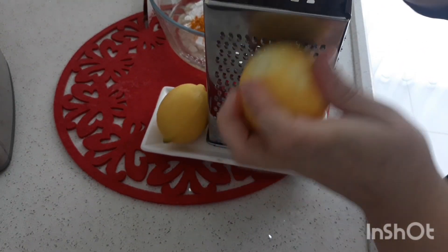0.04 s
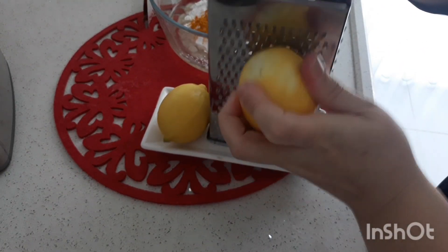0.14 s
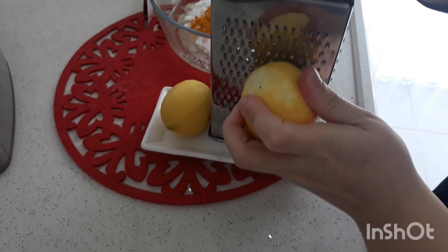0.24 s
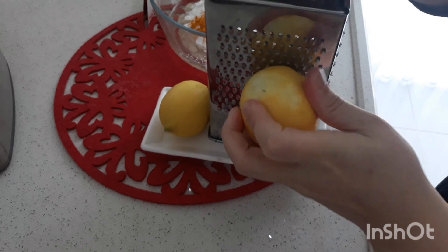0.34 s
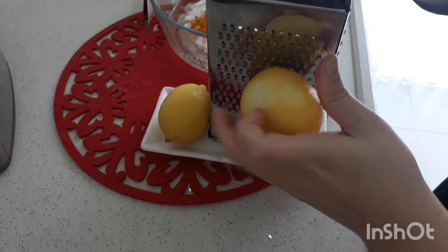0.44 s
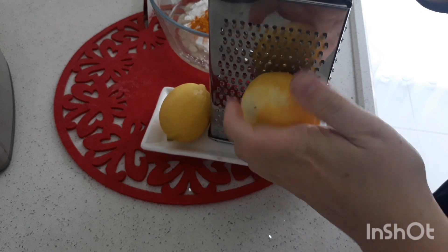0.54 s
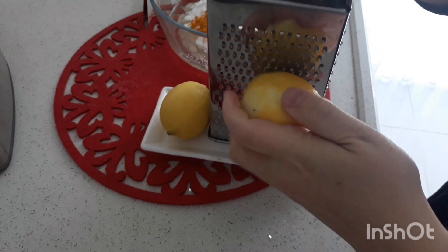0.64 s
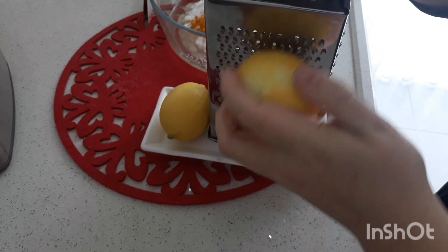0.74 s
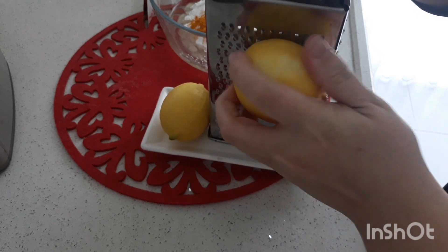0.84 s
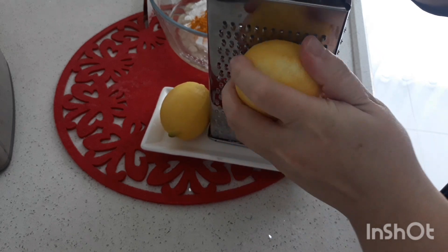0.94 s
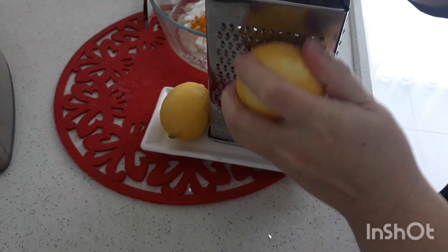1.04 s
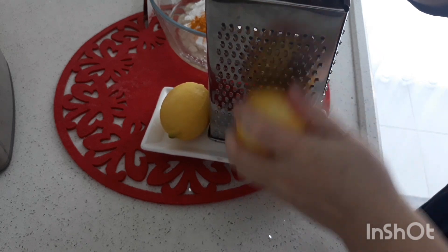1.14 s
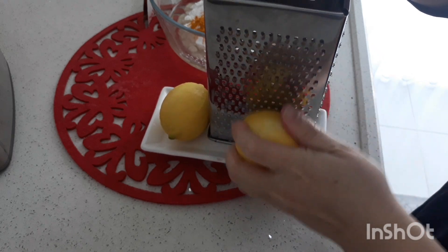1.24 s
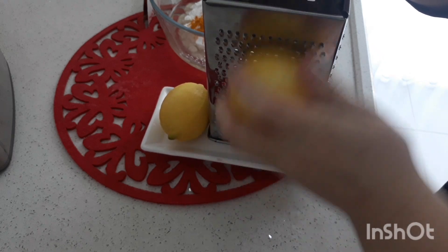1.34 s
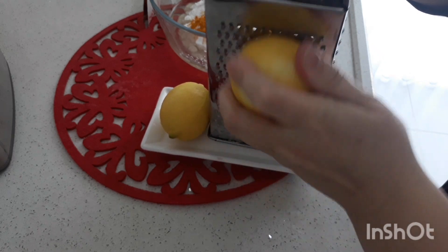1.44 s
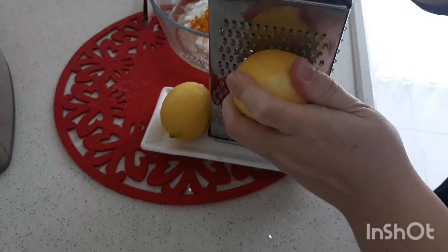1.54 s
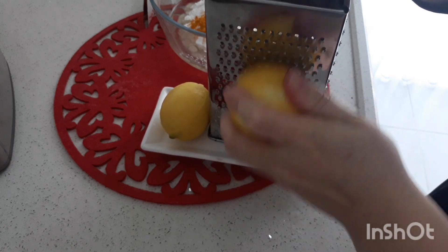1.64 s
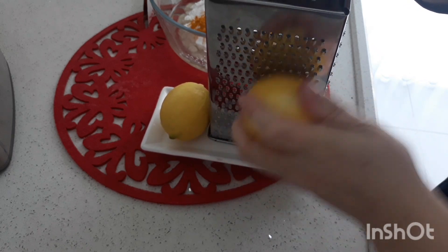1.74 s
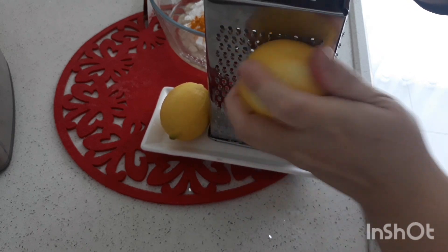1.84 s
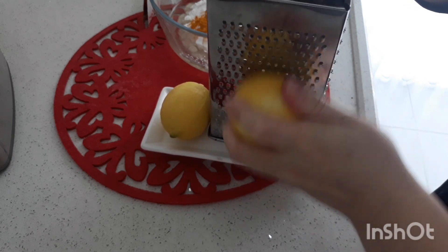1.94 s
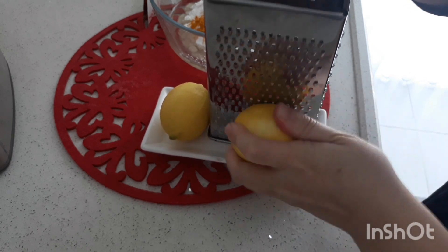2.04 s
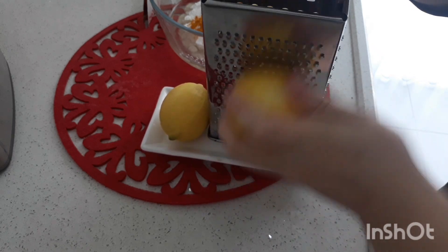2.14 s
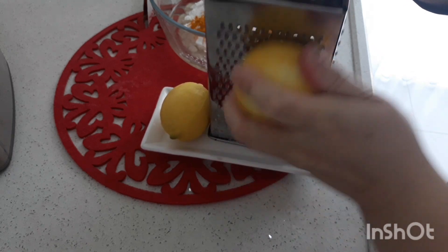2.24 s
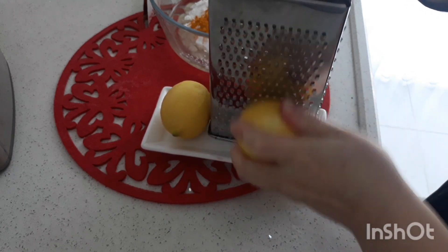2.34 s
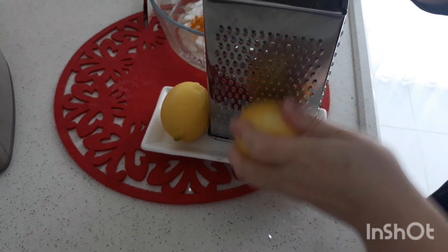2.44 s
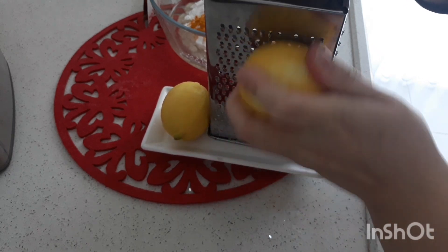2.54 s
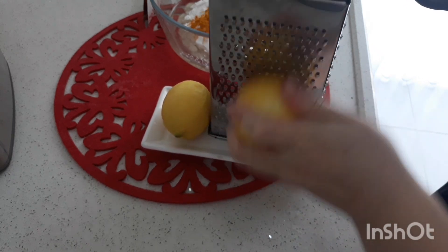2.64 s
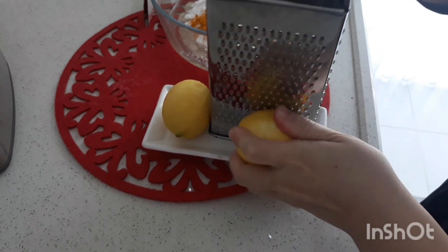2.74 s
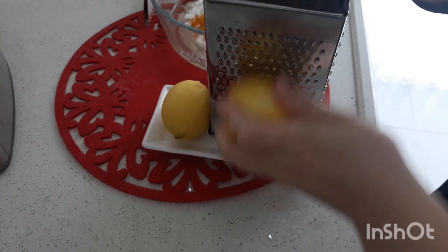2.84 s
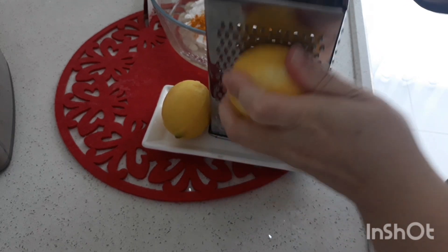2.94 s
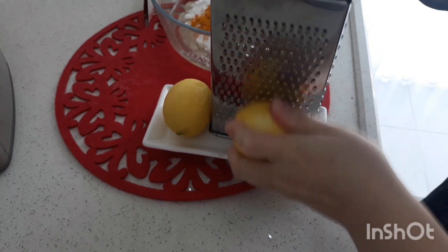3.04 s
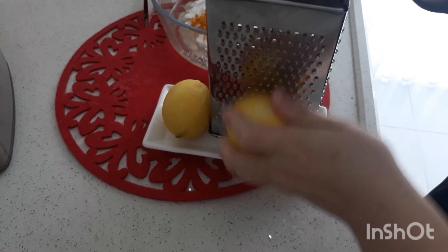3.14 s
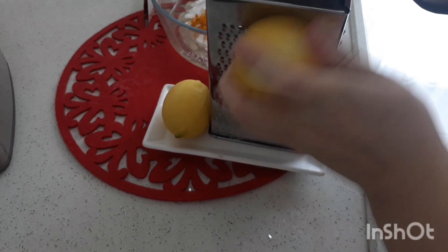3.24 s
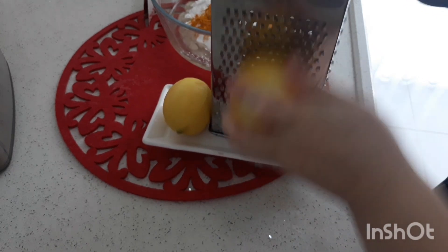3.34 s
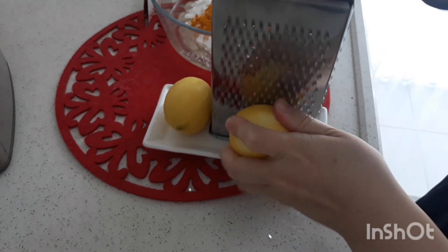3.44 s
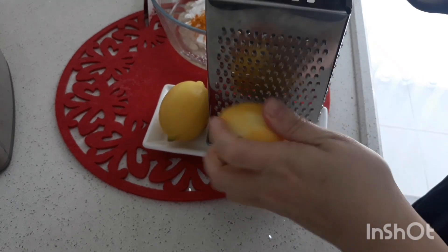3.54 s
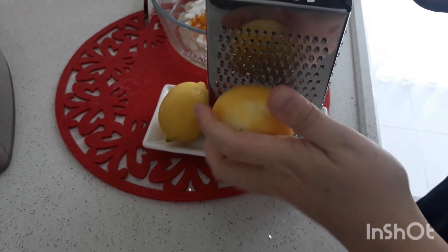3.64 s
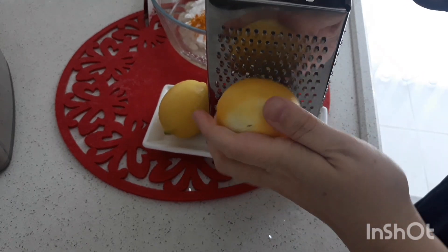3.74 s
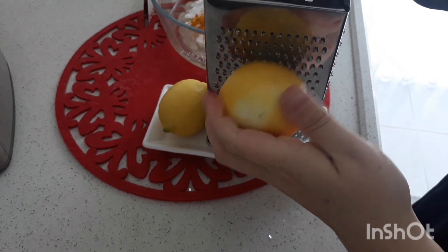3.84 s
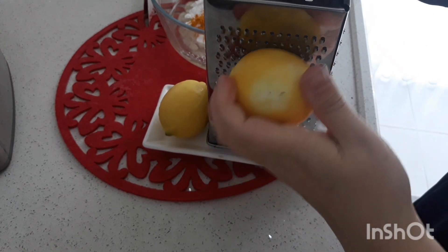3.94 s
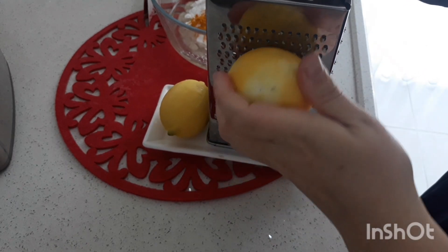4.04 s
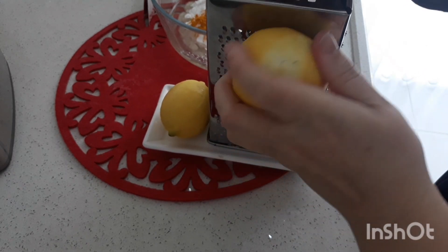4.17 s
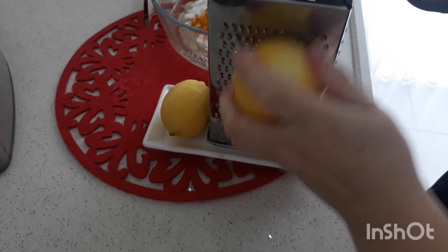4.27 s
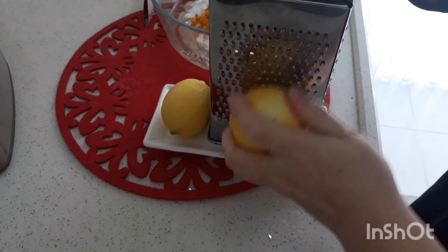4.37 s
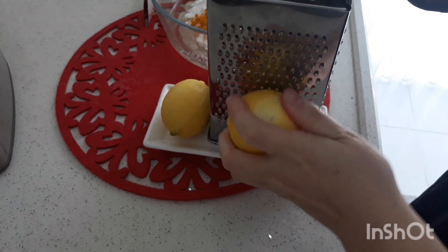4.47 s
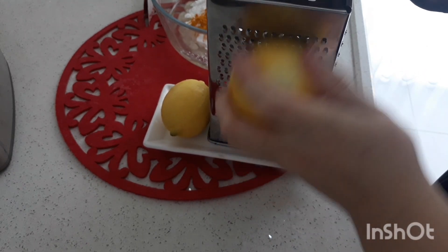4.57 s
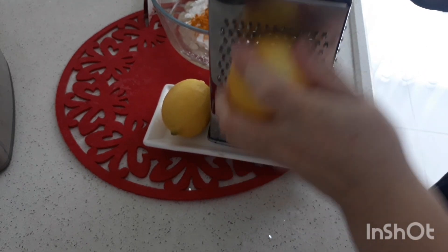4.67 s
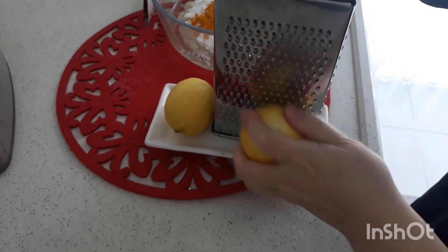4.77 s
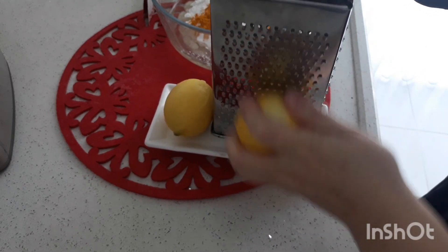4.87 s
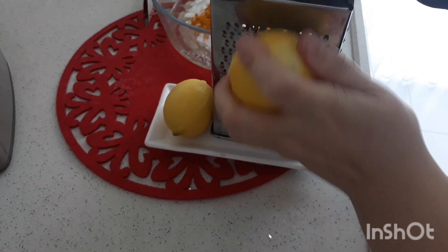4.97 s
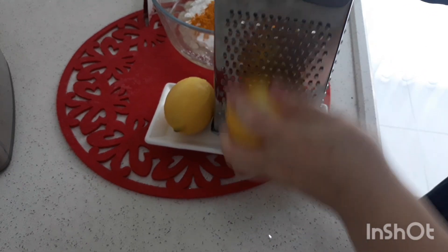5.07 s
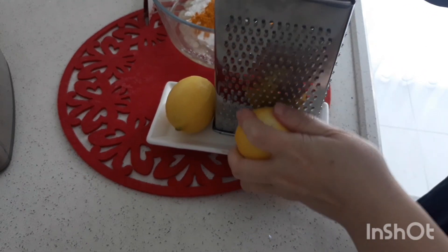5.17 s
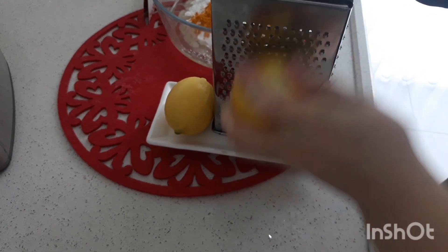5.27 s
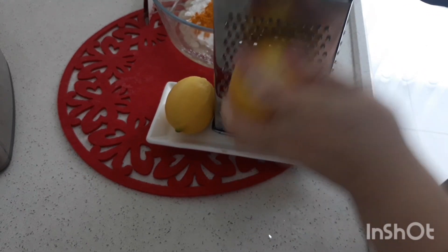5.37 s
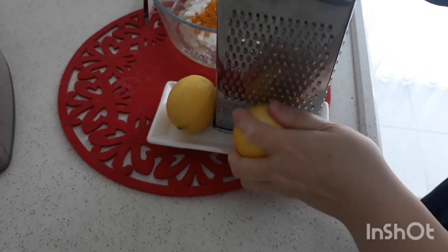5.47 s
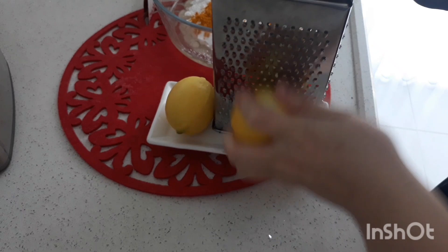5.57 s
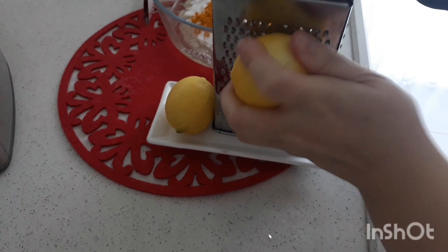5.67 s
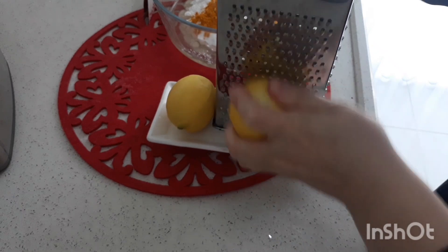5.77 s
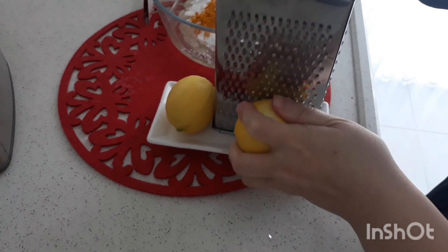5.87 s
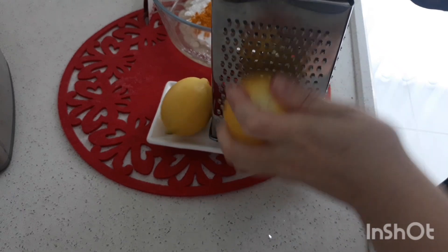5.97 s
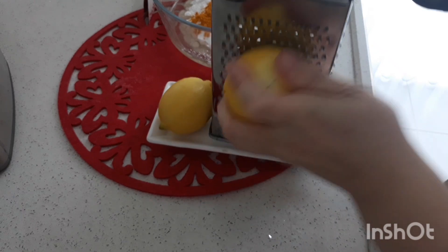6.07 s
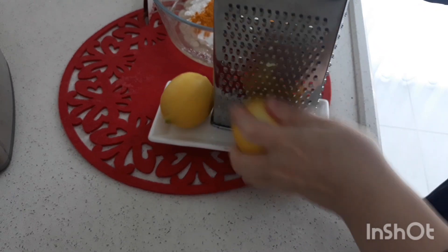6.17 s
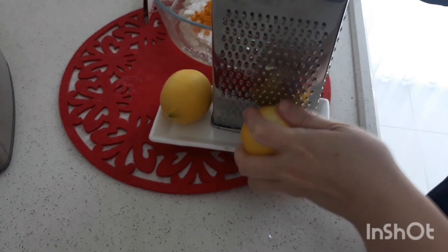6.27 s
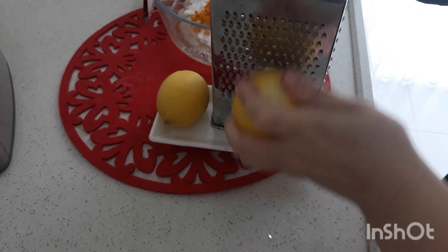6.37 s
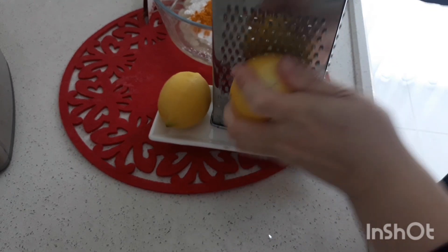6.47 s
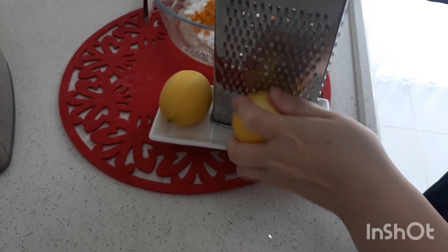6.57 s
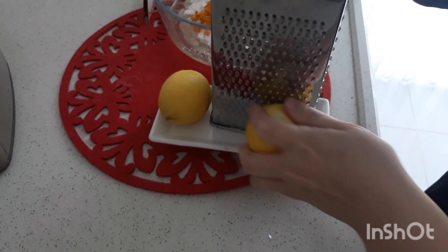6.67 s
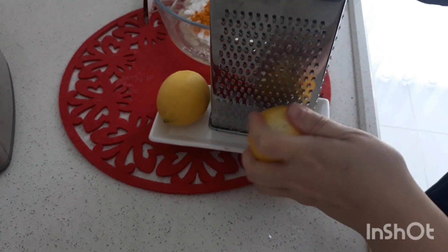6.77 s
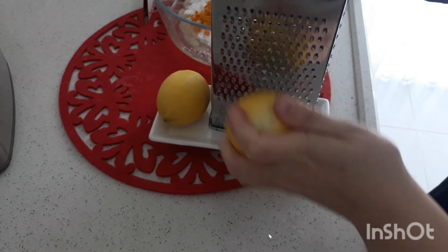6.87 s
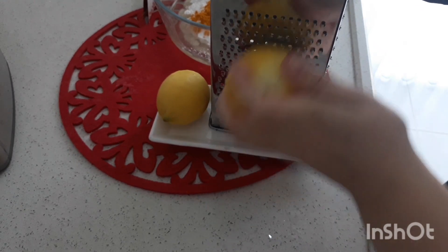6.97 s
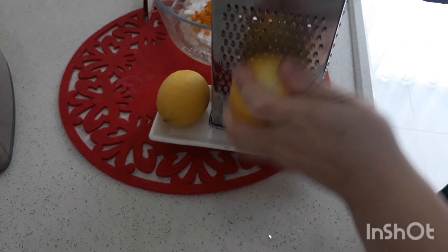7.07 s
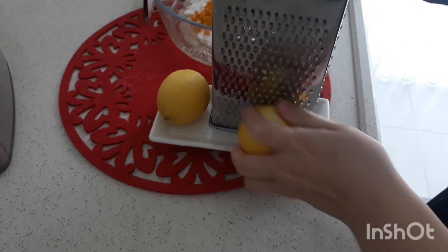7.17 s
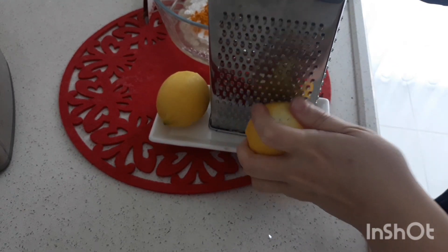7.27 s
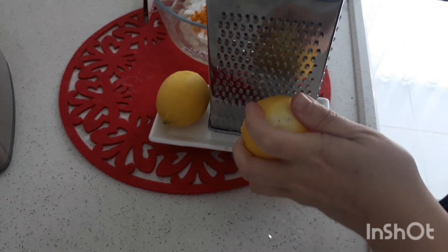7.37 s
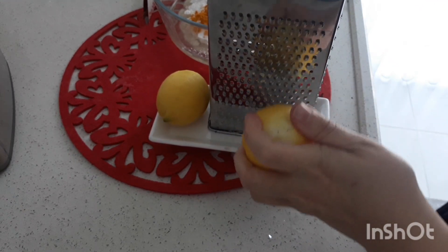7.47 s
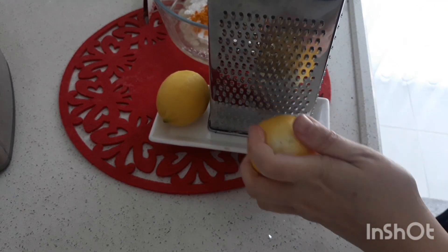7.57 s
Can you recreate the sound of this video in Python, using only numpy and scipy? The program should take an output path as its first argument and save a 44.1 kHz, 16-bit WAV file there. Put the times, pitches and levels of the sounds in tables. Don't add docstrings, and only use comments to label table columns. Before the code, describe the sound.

A citrus fruit is grated in short, bright, tearing scrapes, the steel grater clanking on its ceramic dish over a low room hum.

```python
import sys
import numpy as np
from scipy import signal
from scipy.fft import rfft, irfft, next_fast_len
from scipy.io import wavfile
from scipy.ndimage import uniform_filter1d, map_coordinates

SR = 44100
rng = np.random.default_rng(int(sys.argv[2]) if len(sys.argv) > 2 else 0)


def unload_wav(signal):
    wavfile.write(
        sys.argv[1],
        SR,
        np.round(np.clip(np.atleast_2d(signal).T, -1, 1) * 32767).astype(np.int16),
    )


def undo_db(level):
    steps = np.asarray(level, float) / 20
    return 10 ** steps


N = 335586


def unit(x):
    return x / np.sqrt(np.mean(x ** 2) + 1e-20)


def along(points, hz):
    f, v = np.transpose(points)
    return np.interp(np.log(hz + 1), np.log(f + 1), v)


def wobble(rate):
    knots = rng.standard_normal(int(N * rate / SR) + 4)
    return map_coordinates(knots, [np.arange(N) * rate / SR])


def filtered(x, response):
    m = next_fast_len(len(x) + SR // 2)
    return irfft(rfft(x, m) * response(np.fft.rfftfreq(m, 1 / SR)), m)[:len(x)]


def peak(f, hz, width):
    return 1j * f * width / (hz * hz - f * f + 1j * f * width)


def patchy(x, depth_db, bands, frames):
    z = signal.stft(x, nperseg=256)[2]
    field = uniform_filter1d(rng.standard_normal(z.shape), size=bands, axis=0)
    field = uniform_filter1d(field, size=frames, axis=1)
    return unit(signal.istft(z * undo_db(depth_db * unit(field)), nperseg=256)[1][:N])


def air():
    # pitch_hz, level_db (per Hz)
    tone = [(18, -70), (30, -43), (85, -13.5), (102, -7), (200, -9), (240, -5), (304, -4), (552, -18),
            (754, -17.5), (2310, -50.5), (7630, -37.5), (9640, -55.5), (13000, -45.5), (16000, -47.5)]
    hum = filtered(rng.standard_normal(N), lambda f: undo_db(along(tone, f)))
    return undo_db(-52.5) * patchy(hum, depth_db=1.0, bands=2, frames=40)


def contact(rows, ring_db_per_s):
    land_s = 60 / 1103.5
    touch_db, sag_db = -8, -1.5
    let_go_s, let_go_db = 0.056, -17
    t = np.arange(0, N / SR + .01, .001)
    power = undo_db(2 * -85)
    for s, swell, hold, db in rows:
        times = s + np.cumsum([-land_s, land_s, swell, hold, let_go_s, 1])
        steps = np.cumsum([touch_db - 60, 60, -touch_db, sag_db, let_go_db, -ring_db_per_s])
        power = power + undo_db(2 * (db + np.interp(t, times, steps)))
    return np.interp(np.arange(N) / SR, t, 10 * np.log10(power))


def pressure():
    # touch_s, swell_s, hold_s, rasp_db, body_db (re rasp)
    strokes = [(0.103, 0.011, 0.089, -26.5, -4), (1.072, .035, 0.07, -23.5, -8.5),
               (1.616, 0.006, .05, -29.5, -5.5), (1.895, 0.039, 0.07, -21, -10.5),
               (2.245, 0.044, 0.068, -18, -10), (2.598, 0.049, 0.043, -14.5, -11),
               (2.953, 0.031, 0.056, -17, -9), (3.304, 0.048, 0.027, -13, -10),
               (4.278, 0.056, 0.03, -18, -10.5), (4.662, 0.044, 0.062, -15, -9),
               (5.024, 0.037, 0.042, -12.5, -8.5), (5.365, .035, 0.05, -14.5, -8.5),
               (5.702, 0.033, 0.055, -21.5, -7), (6.091, 0.037, 0.054, -17.5, -7.5),
               (6.47, .04, 0.047, -21.5, -7.5), (7.059, 0.037, 0.036, -18.5, -8.5)]
    # touch_s, length_s, rasp_db, body_db (re rasp)
    drags = [(.002, 0.0053, -30.5, -2), (1.03, 0.034, -54, -2), (1.85, 0.044, -43.5, -8),
             (5.002, 0.016, -39, -3), (1.26, 0.067, -41.5, 1.5), (1.35, 0.015, -41.5, -6),
             (1.41, 0.051, -34, -0.5), (1.468, 0.023, -29.5, -14), (.34, 0.095, -57.5, 6),
             (2.1, 0.033, -40, -3.5), (2.44, 0.025, -36.5, -5.5), (2.79, 0.037, -38, -5.5),
             (3.13, 0.056, -37, -2.5), (3.22, 0.036, -43, 4), (3.46, 0.049, -32.5, -1),
             (4.22, 0.052, -53, -2.5), (4.51, 0.025, -47.5, -14), (4.85, 0.063, -38, -4),
             (5.2, 0.035, -37.5, -1), (5.55, .05, -40, -5), (5.92, 0.061, -35.5, 0), (6.58, 0.013, -32, -3)]
    # touch_s, length_s, rasp_db, body_db (re rasp)
    scuffs = [
        (.484, .03, -52.5, 2.5),
        (.664, 0.011, -57.5, 6),
        (.8, .008, -58, 13),
        (3.92, 0.065, -57.5, -24),
        (4.011, 0.0096, -50.5, 6),
        (4.113, 0.012, -50, 0),
        (6.791, .008, -43, -0.5),
        (6.988, .01, -57.5, -5),
        (7.354, 0.011, -39, 1.5),
    ]
    rows = [(*row, -17.5) for row in strokes]
    for table, swell_share, fizz in (drags, 0.35, -17), (scuffs, 0.3, -28):
        for s, length, db, body in table:
            rows.append((s, swell_share * length, (1 - swell_share) * length, db, body, fizz))
    s, swell, hold, db, body, fizz = np.transpose(rows)
    rasp_db = contact(zip(s, swell, hold, db), ring_db_per_s=167)
    body_db = contact(zip(s, swell, hold, db + body), ring_db_per_s=114)
    fizz_db = contact(zip(s, swell, hold, db + fizz), ring_db_per_s=164.5)
    return rasp_db, body_db - rasp_db, fizz_db - rasp_db


def ticks(rate, spread_db, life):
    when, size = rng.random((2, N))
    catch = (when < rate / SR) * undo_db(-spread_db * np.log(size + 0.0054))
    fade = np.exp(-np.arange(SR // 100) / SR / life)
    power = abs(signal.fftconvolve(catch ** 2, fade)[:N])
    return unit(np.sqrt(power) * rng.standard_normal(N))


def teeth(count, low_hz, high_hz, cycles, spread_db):
    when, pitch, size = rng.random((count, 3)).T[:, :, None]
    hz = low_hz + (high_hz - low_hz) * pitch
    k = np.arange(SR // 250)
    decay = np.exp(-k * hz / SR / cycles)
    twang = undo_db(-spread_db * np.log(size + 0.0058)) * decay * np.sin(2 * np.pi * hz * k / SR)
    places = (when * N).astype(int) + k
    return unit(np.bincount(places.ravel(), twang.ravel(), minlength=N)[:N])


def walls(f):
    # pitch_hz, width_hz, level_db
    steel = [(425.6, 22, 0), (667, 18, -0.5), (1224, 150, -8), (1535, 27, -5.5), (2010, 77, -4),
             (2410, 22, -12.5), (3270, 240, -11), (3630, 28, -10), (4170, 60, -11.5), (4470, 240, -9),
             (5460, 350, -15.5), (6330, 120, -3), (7690, 1100, -2.5)]
    return 1 + undo_db(2) * sum(undo_db(db) * peak(f, hz, width) for hz, width, db in steel)


def rasp():
    # pitch_hz, level_db (per Hz)
    tear_tone = [(1180, -27), (2000, -12), (2380, -9), (2590, -4), (5140, 0.5), (6460, -6), (7680, -5),
                 (8770, -9), (10500, -28), (13600, -54.5), (22000, -120)]
    # pitch_hz, level_db (per Hz)
    body_tone = [(88, -43.5), (150, -16), (277, -8.5), (611, -7), (667, -3.5), (889, -7.5), (1360, -1.5),
                 (3000, -8.5), (3900, -7.5), (6600, -120)]
    # pitch_hz, level_db (per Hz)
    fizz_tone = [(5290, -55), (9000, -23), (10200, -8), (11400, -6), (13900, -0.5), (15700, -4)]
    # peak_s, surge_db
    snags = [(1.106, 0.5), (1.484, 8), (1.945, 2.5), (2.018, 7), (2.308, 4.5), (2.7, 4.5), (3.33, 3.5),
             (4.301, 1.5), (4.75, 4.5), (5.095, 1), (5.399, 0.5), (5.769, 4), (5.8, 2.5), (6.134, -2),
             (6.526, 6.5), (6.542, 5.5), (7.12, 0.5), (7.147, 6.5)]
    rasp_db, body_db, fizz_db = pressure()
    grip_db = rasp_db + 0.65 * wobble(40)
    reach = SR // 50
    surge = np.exp(-(np.arange(-reach, reach) / SR / 0.0063) ** 2)
    for s, db in snags:
        grip_db[round(s * SR) - reach:][:2 * reach] += db * surge

    scratch = ticks(rate=5500, spread_db=-1.5, life=0.00038)
    tear = teeth(count=30000, low_hz=1850, high_hz=10500, cycles=6.8, spread_db=3.0) + 1.92 * scratch
    tear = filtered(tear, lambda f: undo_db(along(tear_tone, f)) * walls(f))
    tear = patchy(tear, depth_db=2.0, bands=3, frames=9)
    body = ticks(rate=2500, spread_db=2.0, life=.0009)
    body = filtered(body, lambda f: undo_db(along(body_tone, f)) * walls(f))
    body = patchy(body, depth_db=3.0, bands=2, frames=9)
    fizz = unit(filtered(scratch, lambda f: undo_db(along(fizz_tone, f))))
    return undo_db(grip_db - 2.0) * (tear + undo_db(body_db + 1.0) * body + undo_db(fizz_db) * fizz)


def weight():
    # peak_s, drone_db
    pushes = [(.21, -38), (1.14, -40), (1.55, -50), (1.97, -61), (2.33, -45), (2.67, -42.5), (2.82, -51),
              (3.03, -40.5), (3.37, -38), (4.32, -43.5), (4.79, -39.5), (5.19, -48.5), (5.47, -36.5),
              (5.77, -41), (6.22, -35.5), (6.5, -59), (7.2, -48), (.002, -48)]
    rise_db_per_s, fall_db_per_s, hold_s = 230.5, 124, 0.008
    s, db = np.transpose(pushes)[:, :, None]
    t = np.arange(0, N / SR + .01, .005)
    build = rise_db_per_s * np.clip(s - t, 0, None)
    fade = fall_db_per_s * np.clip(t - s - hold_s, 0, None)
    return np.interp(np.arange(N) / SR, t, (db - build - fade).max(axis=0))


def counter():
    turns = np.cumsum(140 + 6 * wobble(18)) / SR
    drone = undo_db(weight() - 2 + 3.0 * wobble(17)) * np.sin(2 * np.pi * turns)
    push_db = uniform_filter1d(pressure()[0], size=SR // 10)
    rumble = unit(filtered(rng.standard_normal(N), lambda f: peak(f, 95, 70) ** 2))
    return drone + undo_db(-43.5 + 0.41 * push_db) * rumble


def ring(modes, t, middle_db, high_db, rattle):
    hz, db, t60 = np.transpose(modes)[:, :, None]
    middle_hz, high_hz = 1900, 3000
    db = db + middle_db * ((hz > middle_hz) & (hz < high_hz)) + high_db * (hz > high_hz)
    shake = rattle * np.cumsum(rng.standard_normal((len(modes), len(t))), axis=1)
    return np.sum(undo_db(db - 60 * t / t60) * np.sin(2 * np.pi * hz * t + shake), axis=0)


def blows(events, modes, ring_db, crack_t60, rattle, settle_db):
    # pitch_hz, level_db (per Hz)
    crack_tone = [(300, -66), (1200, -7), (4500, -2), (8200, -0.5), (9800, -22), (16000, -30)]
    lead_s = attack_s = .0003
    out, t = np.zeros(N + SR), np.arange(SR // 5) / SR
    settle = settle_db * np.clip((t - .017) / .004, 0, 1)
    for s, db, crack_db, middle_db, high_db in events:
        crack = unit(filtered(rng.standard_normal(len(t)), lambda f: undo_db(along(crack_tone, f))))
        crack = undo_db(crack_db - 3.5 - 60 * t / crack_t60) * crack
        clank = undo_db(ring_db + settle) * ring(modes, t, middle_db, high_db, rattle)
        blow = undo_db(db) * (clank + crack) * (1 - np.exp(-t / attack_s))
        out[round((s - lead_s) * SR):][:len(t)] += blow
    return out[:N]


def foot():
    # peak_s, peak_db, crack_db, middle_modes_db, high_modes_db
    clacks = [(0.103, -7.5, -3, 3, 0), (1.4028, -13, -10, 3.5, -2.5), (2.2207, -12, -4, -1, -1.5),
              (2.9365, -21.5, 2.5, 15, 9.5), (3.3048, -18, 4.5, 4, 4.5), (4.2625, -32, 3.5, -5, -1),
              (4.6647, -17, 1, -9, -1), (5.021, -25.5, 3, 0, 3), (5.344, -17, -4, 7.5, 0.5),
              (5.7052, -35, 5.5, 3, -0.5), (6.096, -28.5, 1.5, 11, 5.5), (6.4615, -45, 15, -8, -5),
              (7.3538, -22.5, -10, -8, 3),
              (0.1806, -25, 8, 10, -9), (0.3157, -34.5, -7.5, 7, -3), (0.4828, -43.5, 4, -11, 3),
               (0.664, -41, -8, -3, -6), (0.8, -46.5, -16, 5, -3), (2.3489, -23, 1.5, 3, 17),
               (3.226, -32, 2, -0.5, 2), (3.256, -27.5, -2, 4.5, -8.5), (3.41, -25.5, 14, -9.5, -1),
               (4.114, -48, -13, -5, 3.5), (4.627, -42.5, -2, -16, 7), (5.661, -34, -3, 9.5, 3)]
    # pitch_hz, level_db, t60_s
    modes = [(665, -9, .06), (1100, -18, .04), (1586, 0, .12), (1720, -14, .04), (1995, -15, .07),
             (2438, -6, .09), (3370, -13, .06), (4050, -15, .07), (4600, -5, .12), (5350, -11, .05),
             (6300, -13, .04), (7700, -8, .07)]
    return blows(clacks, modes, ring_db=-8, crack_t60=0.051, rattle=.022, settle_db=-10)


def knocks():
    # peak_s, peak_db, crack_db, middle_modes_db, high_modes_db
    hits = [
        (0.1388, -16.5, 4.5, 4.5, 8),
        (0.511, -29.5, -15, -2.5, -6),
        (1.4943, -24.5, -12, 0.5, 0),
        (3.4756, -25, -11, 1, -2),
        (4.0114, -28.5, -11.5, -3.5, -4.5),
        (5.7292, -18, -0.5, 1.5, 4),
        (5.9643, -14, -7.5, -4, -2.5),
        (6.0628, -23.5, -7, 0, -1),
        (6.7935, -19, -14, -3, -4),
        (7.0345, -23.5, -10.5, -6, -8),
    ]
    # pitch_hz, level_db, t60_s
    modes = [(710, -19.5, 0.26), (1230, -33, 0.053), (1250, -21, 0.14), (1357, 2.5, 0.082),
             (1440, -15, 0.057), (1580, -10, 0.19), (2575, -1, 0.07), (3720, -15, 0.079), (4200, -26, 0.12),
             (4680, -10.5, 0.071)]
    return blows(hits, modes, ring_db=-7.0, crack_t60=0.056, rattle=0.027, settle_db=-3.0)


def bumps():
    # start_s, peak_db
    touches = [
        (0.801, -37),
        (2.563, -38.5),
        (6.434, -35),
        (6.991, -38),
    ]
    out, t = np.zeros(N + SR), np.arange(SR // 5) / SR
    for s, db in touches:
        puff = unit(filtered(rng.standard_normal(len(t)), lambda f: peak(f, 460, 280) ** 2))
        out[round(s * SR):][:len(t)] += undo_db(db - 7.5 - 60 * t / .1) * puff
    return out[:N]


def rubs():
    # start_s, end_s, pitch_hz, level_db
    slides = [
        (.91, 1.05, 1850, -64),
        (3.955, 4.01, 1620, -61),
        (1.31, 1.38, 1540, -48),
        (7.557, 7.6, 1330, -62),
        (3.908, 3.955, 7500, -54),
        (5.91, 5.962, 1600, -44),
        (4.975, 4.995, 1900, -48),
        (3.478, 3.525, 1520, -32),
    ]
    out = np.zeros(N + SR)
    for start, end, hz, db in slides:
        t = np.arange(round((end - start) * SR)) / SR
        fade = np.clip(np.minimum(t, end - start - t) / 0.003, 0, 1)
        tone = unit(filtered(rng.standard_normal(len(t)), lambda f: peak(f, hz, 0.16 * hz) ** 2))
        out[round(start * SR):][:len(t)] += undo_db(db) * fade * tone
    return out[:N]


def dish():
    # start_s, level_db, middle_modes_db, high_modes_db, lowest_mode_db
    lifts = [
        (4.27, -33.5, -9, -9, 0),
        (4.7, -31.5, -13, -8, -4),
        (5.08, -21, 4, -9, -3.5),
        (5.42, -51, -9, -7.5, 13.5),
        (6.16, -29, 9.5, 14, -37),
    ]
    # pitch_hz, level_db, t60_s
    modes = [(580, -10, 1.5), (1265, -4, .7), (1357, 0, .9), (2127, -3, .43), (4045, -8, .3)]
    out, t = np.zeros(N + SR), np.arange(SR // 2) / SR
    touch = 1 / (1 + np.exp((t - .28) / 0.011))
    swell = 1 - np.exp(-t / 0.012)
    for s, db, middle_db, high_db, low_db in lifts:
        upper = ring(modes[1:], t, middle_db, high_db, rattle=.004)
        lowest = undo_db(low_db) * ring(modes[:1], t, 0, 0, rattle=0)
        out[round(s * SR):][:len(t)] += undo_db(db) * (upper + lowest) * swell * touch
    return out[:N]


def kitchen(x):
    # pitch_hz, t60_s
    decay = [(200, 0.78), (2000, 0.46), (6000, 0.39), (12000, 0.032)]
    hz, t, z = signal.stft(rng.standard_normal(SR), SR, nperseg=256)
    tail = signal.istft(z * undo_db(-60 * t / along(decay, hz)[:, None]), SR, nperseg=256)[1]
    late = np.pad(x, (200, 0))
    return signal.fftconvolve(late, tail / np.linalg.norm(tail))[:N]


def scene():
    rub = rasp()
    hits = foot() + knocks() + bumps() + rubs()
    room = undo_db(-10.5) * kitchen(rub) + undo_db(-16) * kitchen(hits)
    return (rub + hits + dish() + room + counter() + air())[None]


def low_pass(x):
    return signal.sosfilt(signal.butter(12, 16650, fs=SR, output="sos"), x)


def record(dry):
    mix = filtered(dry[0], lambda hz: (hz < 15750) / (1 + (42 / (hz + 1)) ** 4))
    return low_pass(mix[None])


dry = scene()
out = record(dry)
unload_wav(out)
```